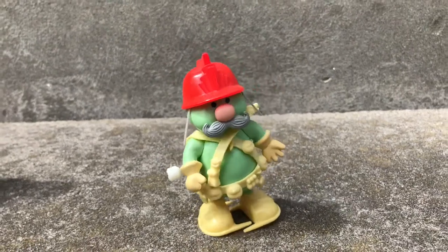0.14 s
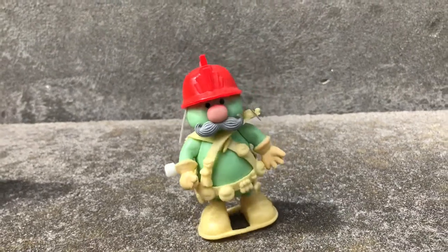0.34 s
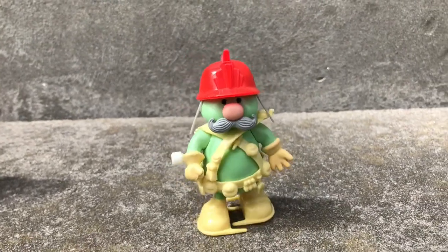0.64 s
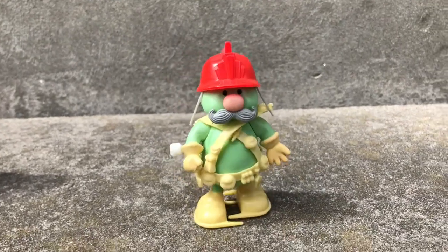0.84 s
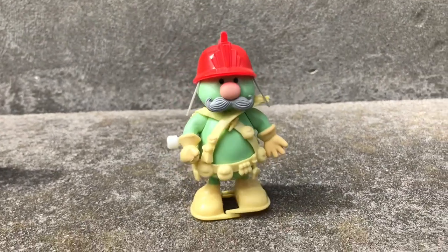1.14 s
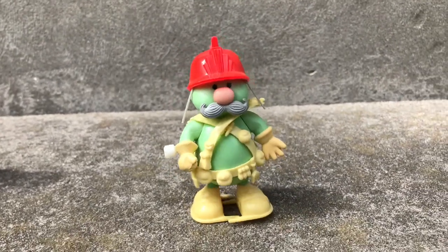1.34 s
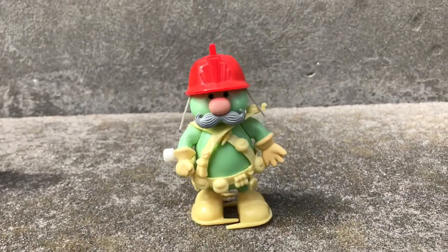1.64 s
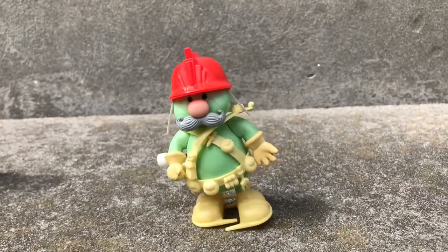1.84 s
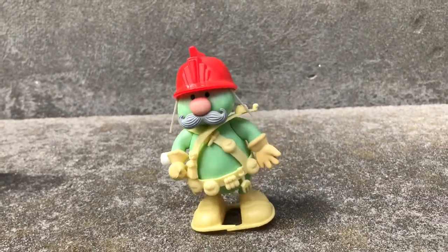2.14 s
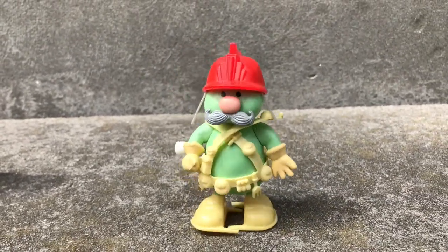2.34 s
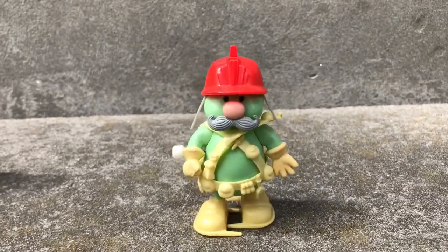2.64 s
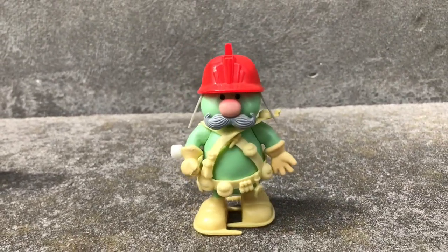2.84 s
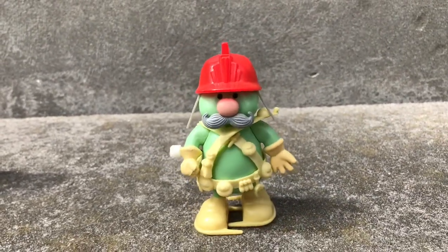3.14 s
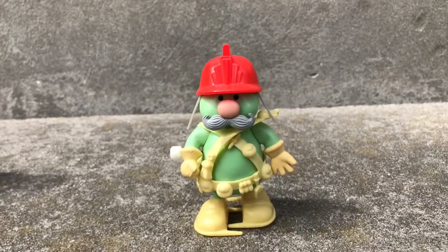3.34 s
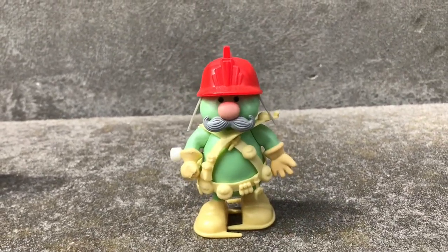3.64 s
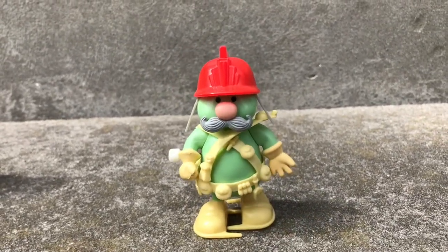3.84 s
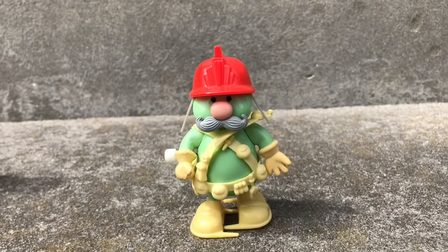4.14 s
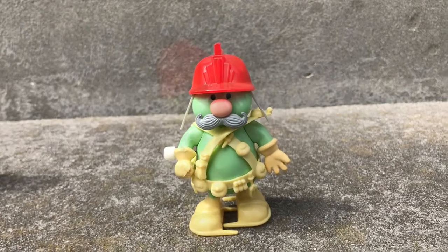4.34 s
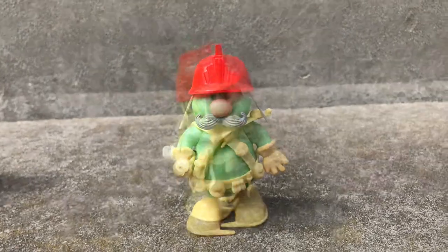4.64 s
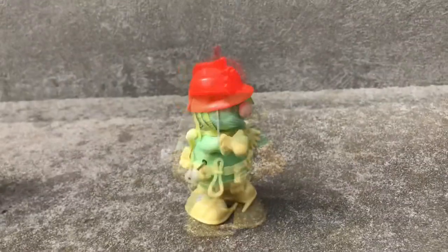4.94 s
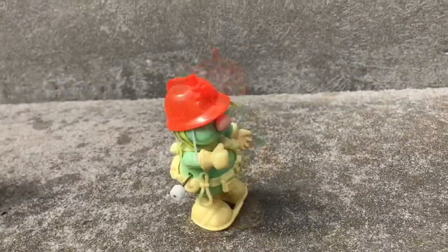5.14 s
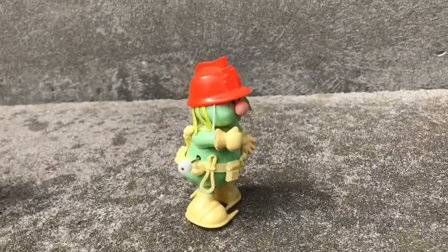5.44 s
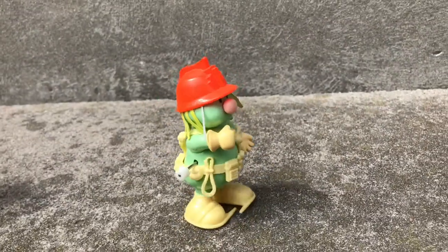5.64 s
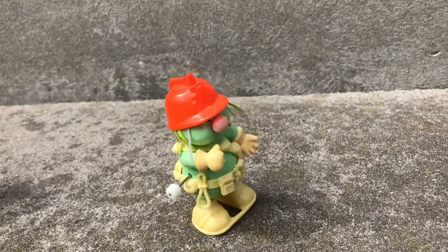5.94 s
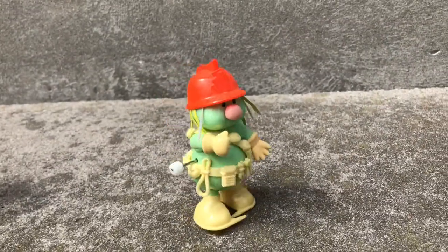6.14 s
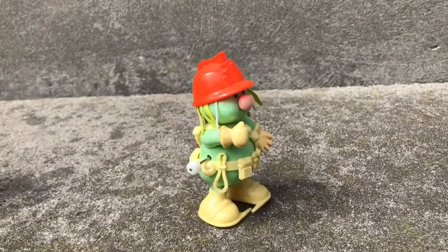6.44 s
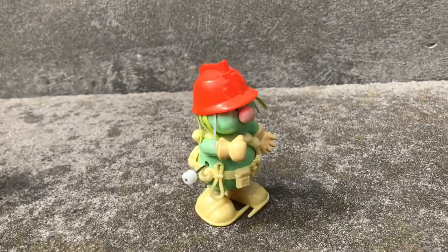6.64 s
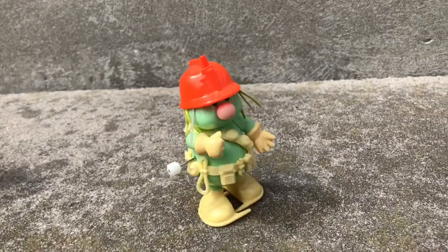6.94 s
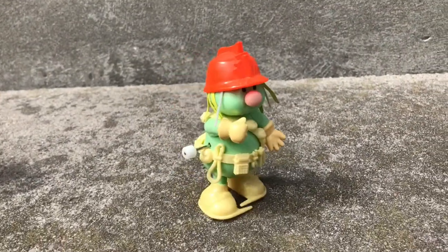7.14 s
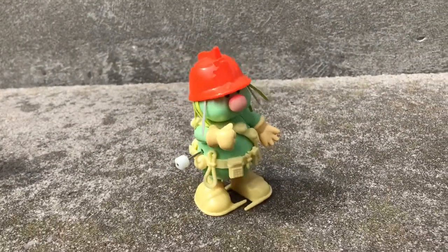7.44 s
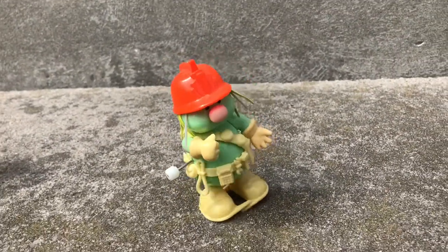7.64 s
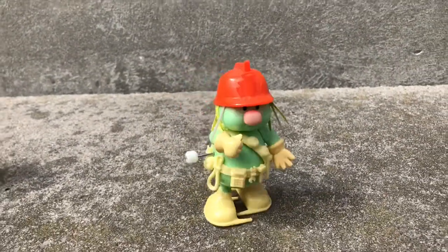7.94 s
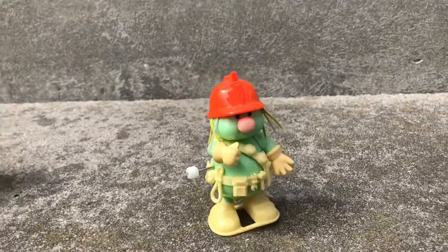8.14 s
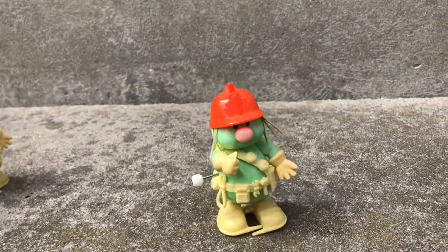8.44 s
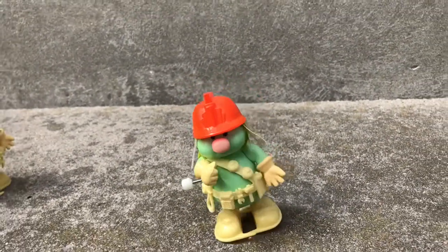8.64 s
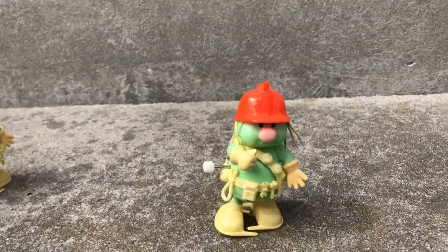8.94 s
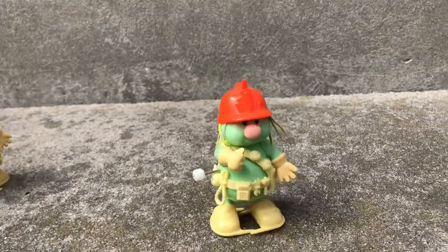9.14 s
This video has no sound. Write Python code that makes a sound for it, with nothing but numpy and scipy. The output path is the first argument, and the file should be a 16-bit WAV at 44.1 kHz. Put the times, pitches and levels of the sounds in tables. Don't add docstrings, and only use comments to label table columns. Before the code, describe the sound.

Close, single-microphone outdoor sound of a wind-up plastic figure: rapid gear teeth buzz inside a hollow case and hard little feet click on concrete. The walk falters, nearly stops, restarts briefly and dies into faint ticks. Quiet distant road rumble, a low engine note and a far gull fill the pause. After a smooth crossfade the toy runs again, rattling continuously and growing somewhat louder and hollower.

```python
import sys
import numpy as np
from scipy import signal
from scipy.fft import rfft, irfft, next_fast_len
from scipy.io import wavfile
from scipy.ndimage import uniform_filter1d, map_coordinates

SR = 44100
rng = np.random.default_rng(int(sys.argv[2]) if len(sys.argv) > 2 else 0)


def bounce(signal):
    frames = np.transpose(np.atleast_2d(signal))
    limited = np.clip(frames, -1, 1)
    pcm = np.round(limited * 32767).astype(np.int16)
    wavfile.write(sys.argv[1], SR, pcm)


def invert_db(x):
    u = np.asarray(x, float) / 20
    return 10 ** u


N = 409248
TIME = np.arange(N) / SR
TURN_S = 3.5


def clockwork():
    # start_s, chatter_db, brightness_db (lean of the gears to the microphone)
    drive_rows = [
        [(0, -35, -1.5), (0.29, -34, 2), (0.68, -34.5, 1.5), (0.7, -44, -4), (0.93, -49.5, -4),
         (1.08, -38, -4.5), (1.35, -28, -3), (1.53, -30.5, -1.5), (1.56, -51, -1.5), (1.7, -52.5, -2),
         (1.77, -38.5, -4), (2.51, -37.5, 3.5), (2.57, -44, -3), (2.68, -48, -4)],
        [(4.3, -32.5, -2.5), (5.7, -29, 0.7), (7.4, -26, 1.2), (9.28, -27, 0.7)],
    ]
    # start_s, foot_mode_hz, foot_db (over the case), case_db, shell_db
    footing = [(0, 3960, -8, 1.5, -1), (.12, 4570, -14, 0, -1.5), (.57, 4100, -4.5, -0.7, 1.5),
               (0.719, 3590, -5.5, 0.5, -2), (1.0, 3600, -6.5, -0.5, 0.5), (1.28, 3700, -3, -2.5, 1),
               (1.4, 4100, -3.5, 2, -1), (1.55, 3600, -14, 5, 6), (1.721, 4450, -5.5, 0.8, -1),
               (2.1, 4600, -26, 1.5, -0.3), (2.42, 4370, -6.5, 0, -2), (2.56, 3600, -13, 2.5, -1),
               (4.3, 5070, -9, 1, 4), (4.539, 4190, 1, -0.5, 2), (4.62, 4790, -1, -1, -2.5),
               (4.691, 3300, -5, 1, 2.5), (4.82, 3536, -9, 0.2, 3), (4.93, 4080, -10, 2.5, 1.5),
               (5.04, 4450, -9, -1.1, -.6), (5.2, 4190, -14, 1, 0.6), (5.43, 4520, -6, -1, 0.5),
               (5.7, 4240, -10, 0.3, -0.2), (6.0, 4100, -15, 0.5, 0.5), (6.18, 4200, -1, 0, 3),
               (6.25, 4320, -8.5, 0, 1.1), (6.53, 4150, -6, -0.5, -1.5), (6.7, 4200, -10, -0.5, 0.5),
               (6.93, 4520, -7, 0.5, -1.5), (7.062, 4234, -1, 0, -3.5), (7.122, 4300, -0.5, -2, 3),
               (7.152, 4554, -7.5, -0.4, -2.5), (7.43, 4080, -10, 0.9, -2.5), (7.8, 4420, -10.5, -0.2, -1),
               (7.9, 4087, -4.5, -1.5, -3.5), (8.079, 4242, -23, 0.6, -4), (8.38, 4420, -8.5, 0.4, -4),
               (8.56, 5920, -6, 0.3, -4), (8.95, 5800, -24, 1, -3.5), (9.052, 2940, -10, 3, -2),
               (9.085, 5800, -6, -1.1, -3)]
    stall_db_per_s, full_speed_db = (584.5, 0), (-34.5, -30.5)
    dull_db_per_brake_db = (0.1042, 0.51)

    level_db, lean_db = np.where(TIME < TURN_S, *map(curves, drive_rows))
    lost_db = braking()
    stall_s = drive_rows[0][-1][0]
    level_db = level_db - lost_db - pose(stall_db_per_s) * (TIME - stall_s).clip(0, .12)
    slower_db = (pose(full_speed_db) - level_db).clip(-9, 45)
    bright_db = lean_db - pose(dull_db_per_brake_db) * lost_db.clip(-9, 15)

    columns = np.transpose(footing)
    stance = np.searchsorted(columns[0], TIME, "right").clip(1) - 1
    _, foot_hz, foot_db, grip_db, hollow_db = columns[:, stance]

    contacts = chatter(slower_db, burst_s=.0008, size_db=.9)
    drive, rocking, hollow = contacts * spiky(rng.standard_normal((3, N)))
    gears = gear_train(drive, bright_db)
    case = case_rattle(drive, rocking, slower_db, foot_hz, foot_db, grip_db)
    small = filtered(gears + case, lambda hz: (hz / 2700) ** 3 / np.sqrt(1 + (hz / 2700) ** 6))
    shell = hollow_shell(hollow, slower_db, hollow_db)

    faded = np.where(TIME < TURN_S, 1, fade_in() ** 1.29)
    unsteady_db = .7 * wobble(16) + .8 * wobble(30)
    return faded * invert_db(level_db - 3 + unsteady_db) * (small + shell)


def chatter(slower_db, burst_s, size_db):
    teeth_hz, slowest_hz, speed_per_db = 440, 135, .5
    coast_db, coast_slide = 17, 3
    speed = invert_db(-speed_per_db * slower_db).clip(slowest_hz / teeth_hz, 1)
    rate = teeth_hz * speed
    scatter = pose((.35, .45))
    slide = pose((.75, 1.9)) * speed ** .5
    coasting = (slower_db > coast_db) & (np.gradient(slower_db) > 0)
    slide = slide + coast_slide * uniform_filter1d(coasting * 1., size=200)

    meshed = np.cumsum(rate * (1 + scatter * wobble(9) / 4)) / SR
    at = np.flatnonzero(np.diff(np.floor(meshed)))
    luck = rng.standard_normal((8000, 2))[:len(at)]
    at = np.clip(at + scatter[at] * luck[:, 0] * SR / rate[at] / 2, 0, N - 1).astype(int)
    teeth = np.bincount(at, invert_db(size_db * luck[:, 1]), N)
    gate = signal.lfilter([1], [1, -np.exp(-1 / (burst_s * SR))], teeth)
    gate = uniform_filter1d(uniform_filter1d(gate, size=36), size=24)

    def loudness(v):
        return np.sqrt(np.abs(uniform_filter1d(v ** 2, size=900)) + 1e-9)

    gate = gate / loudness(gate) + slide
    return gate / loudness(gate)


def braking():
    # slowest_s, brake_db (negative is a surge), braking_s, recovery_s
    loads = [(0.002, -4.5, 0.0023, 0.008), (0.222, 3, 0.012, 0.015), (0.28, -4, 0.019, 0.02),
             (1.347, -1.5, 0.015, 0.017), (0.138, 6.5, 0.039, 0.063), (0.385, -6.5, 0.015, 0.016),
             (0.589, 5.5, 0.047, 0.0142), (0.733, 7, 0.018, 0.01), (0.783, 8, 0.02, 0.0039),
             (0.864, -7.5, 0.013, 0.008), (0.912, 21.5, 0.043, 0.0053), (1.005, 49, 0.077, 0.021),
             (1.178, 6, 0.026, 0.023), (1.417, 13.5, 0.053, 0.13), (1.573, 8, 0.012, 0.014),
             (1.628, 3, 0.032, 0.0035), (1.703, 28, 0.058, 0.053), (1.978, 18, 0.033, 0.013),
             (1.987, -9.5, 0.008, 0.015), (2.11, 14, 0.044, 0.023), (2.4, 8, 0.024, 0.0047),
             (2.514, -5, 0.021, 0.0053), (2.553, 14, 0.035, 0.026), (2.641, 9, 0.011, 0.13)]
    loads_turned = [(4.893, -2.5, 0.054, 0.0095), (5.04, 3, 0.013, 0.013), (5.394, -2.5, 0.022, 0.019),
                    (5.72, -3.5, 0.017, 0.014), (6.345, -3.5, 0.015, 0.0084), (6.584, 2.5, 0.013, 0.02),
                    (7.13, -2.5, 0.014, 0.03), (7.94, 0, 0.021, 0.028), (8.03, -2.5, 0.022, 0.014),
                    (8.595, 1, 0.014, 0.01), (8.631, -1.5, 0.014, 0.0054), (9.075, -2.5, 0.022, 0.01),
                    (9.188, -4, 0.015, 0.0152), (4.922, 6, 0.023, 0.19), (5.21, 6, 0.031, 0.02763),
                    (5.334, 3.5, 0.017, 0.0303), (5.483, 4, 0.034, 0.0857), (5.775, 7, 0.034, 0.0198),
                    (5.885, 2.5, 0.035, 0.0977), (6.045, 5, 0.017, 0.14), (6.235, 4.5, 0.027, 0.0512),
                    (6.36, 3.5, 0.033, 0.1305), (6.613, 5, 0.047, 0.053), (6.717, 6, 0.026, 0.0765),
                    (6.809, 2.5, 0.049, 0.1), (6.906, 7, 0.036, 0.0814), (7.091, 8.4, 0.084, 0.0497),
                    (7.197, 8, 0.045, 0.0776), (7.464, 10, 0.031, 0.078), (7.574, 6, 0.019, 0.14),
                    (7.683, 3.5, 0.024, 0.0517), (7.761, 7.5, 0.036, 0.097), (7.877, 7, 0.021, 0.0697),
                    (8.064, 8, 0.076, 0.0952), (8.17, 2.6, 0.024, 0.028), (8.341, 12, 0.028, 0.061),
                    (8.454, 8.4, 0.025, 0.17), (8.65, 6, 0.027, 0.091), (8.723, 1.5, 0.045, 0.119),
                    (8.862, 3, 0.028, 0.091), (8.994, 9.5, 0.079, 0.046), (9.114, 4.5, 0.038, 0.078),
                    (9.273, 8.5, 0.07, 0.05)]
    lost_db = np.zeros(N)
    for s, db, fall_s, recover_s in [*loads, *loads_turned]:
        span = slice(max(round((s - fall_s) * SR), 0), round((s + 8 * recover_s) * SR))
        t = TIME[span] - s
        back = 1 - (1 - invert_db(-db)) * np.exp(-t.clip(0) / recover_s)
        lost_db[span] += np.where(t < 0, db * (1 + t / fall_s), -20 * np.log10(back))
    return lost_db


def gear_train(drive, bright_db):
    # centre_hz, width_hz, level_db
    gear_modes = [
        [(8740, 780, 2), (11130, 320, 1.5), (12120, 1500, 1), (16300, 2100, -4)],
        [(8890, 750, -3.5), (9840, 116, 1.5), (12000, 2300, -4.5), (13100, 810, -1), (14600, 1400, -2),
         (15300, 470, -9)],
    ]
    gears = patchy(posed(drive, gear_modes), patchy_db=1.2, streak_db=2.4)
    top = filtered(gears, lambda hz: hz > 10800)
    return (gears - top) * invert_db(-bright_db / 2) + top * invert_db(bright_db / 2)


def case_rattle(drive, rocking, slower_db, foot_hz, foot_db, grip_db):
    # centre_hz, width_hz, level_db
    case_modes = [
        [(4100, 950, -8.5), (4650, 550, -4.5), (5610, 400, -3), (6120, 236, 0.5), (6910, 800, -9)],
        [(3300, 2570, -7.5), (4200, 770, -1), (5050, 1420, -1.5), (5620, 690, 3), (7100, 250, 1),
         (7190, 200, 1.5)],
    ]
    case_db = pose((-3, -5)) + pose((0.14, 0.24)) * slower_db + 0.32 * slower_db.clip(max=0)
    case = patchy(posed(drive, case_modes), patchy_db=1.2, streak_db=2.4)
    foot_gain = invert_db(uniform_filter1d(foot_db, size=900) + 2.6 * wobble(25))
    case += foot_gain * moving_mode(rocking, foot_hz * (1 + .02 * wobble(12)), width_hz=330)
    return invert_db(case_db - 2.5 + uniform_filter1d(grip_db, size=2000)) * case


def hollow_shell(hollow, slower_db, hollow_db):
    # centre_hz, width_hz, level_db
    shell_modes = [
        [(874, 99, 3), (1690, 680, 1.5), (1940, 72, 8.5), (2370, 270, 5)],
        [(932, 113, 3), (1433, 397, -6.5), (2370, 140, 5)],
    ]
    shell_db = pose((-19.5, -20.5)) + pose((0.29, 0.53)) * slower_db
    shell_db = shell_db + 0.47 * (TIME - 7).clip(-3) * (TIME > TURN_S)
    shell_db = shell_db + uniform_filter1d(hollow_db, size=2000)
    return invert_db(shell_db + 3.0 + 2.76 * wobble(11)) * posed(hollow, shell_modes)


def feet_and_loose_parts():
    # start_s, peak_db, pitch_hz, upper_mode_db
    steps = [(0.0974, -26.5, 4570, -10), (0.182, -27, 4460, 0), (0.2428, -25.5, 3880, -6),
             (0.2614, -47, 4650, -2), (0.2773, -26, 4730, 8), (0.3774, -43, 4590, -4),
             (0.7674, -42, 3280, -15), (0.787, -30, 3695, -17), (0.9233, -53, 3490, 6),
             (1.0086, -61, 3580, 1), (1.3379, -39.5, 3800, -9.5), (1.3622, -22.5, 3970, -19),
             (1.5254, -25, 3650, -1), (1.5754, -42, 4020, 6), (1.592, -28.5, 3820, -15),
             (1.598, -30.5, 4990, 8), (1.6054, -31, 3470, -17), (1.619, -35, 3960, 9),
             (1.6395, -30.5, 4100, 8), (1.6606, -39.5, 3930, 0), (1.6821, -47.5, 3006, -15),
             (1.7122, -37, 4150, 14), (1.7407, -42.5, 4100, -4), (1.987, -32, 4650, 6),
             (2.572, -34, 3487, -14), (2.587, -40, 3260, 0), (2.6244, -37, 4580, -12)]
    # start_s, peak_db, pitch_hz, upper_mode_db
    clacks_turned = [(4.5463, -39, 4200, -18), (4.7773, -37, 3300, -7), (4.903, -32, 4500, -22),
                     (5.023, -31, 3884, -20), (5.1647, -20, 4070, -6), (5.3926, -25, 4220, -16),
                     (5.496, -25, 4650, -22), (5.6608, -30, 4650, -13), (5.81, -34, 4100, -8),
                     (5.9526, -25.5, 4170, -10), (6.024, -25, 4440, 3), (6.0305, -28, 3300, -4),
                     (6.198, -34, 4300, -15), (6.2088, -25.5, 4350, -15), (6.342, -26, 4400, -11),
                     (6.557, -24, 4120, -15), (6.662, -28, 4200, -10), (6.65, -31, 3800, -15),
                     (6.6947, -33, 4397, 1), (6.8425, -16.5, 4020, -27), (6.846, -26, 3900, -27),
                     (6.9745, -42, 4392, -8), (7.0833, -21.5, 4460, -20), (7.102, -31, 3850, -21),
                     (7.1295, -27, 4090, -17), (7.6972, -24, 4200, 5), (7.7243, -25, 4600, -17),
                     (6.854, -25, 4300, -12), (8.0267, -25, 4240, 2), (8.626, -29, 3820, -12),
                     (8.6316, -20.5, 4390, -7), (8.8603, -26.5, 4320, -18), (8.884, -26, 4000, -5),
                     (9.0803, -24, 4250, 1), (9.213, -23, 3920, -23),
                     (4.6014, -36, 4343, -13), (5.1594, -26, 4070, -1), (5.7514, -27, 4414, -7),
               (6.0531, -26, 4100, -1), (6.421, -27.5, 4600, -6), (6.605, -35, 3350, -11),
               (6.8764, -27.5, 4530, 3), (7.1677, -24.5, 4530, -12), (7.441, -27.5, 4560, -6),
               (7.9875, -37, 4193, -8), (8.1463, -33.5, 3490, -11), (8.2275, -28, 4490, -11),
               (8.305, -26, 3970, -6), (8.923, -34.5, 3950, -8), (9.0358, -27, 4140, 0),
               (4.968, -33, 4050, -10), (5.353, -25, 4090, -11), (5.474, -35, 4490, -8),
               (5.529, -28, 4800, -8), (5.574, -35, 4760, -6), (5.92, -32, 4603, 3), (6.002, -27, 5310, -1),
               (6.067, -25.5, 4880, -7), (6.223, -30, 4100, -12), (7.9043, -31, 4390, -13),
               (7.9236, -32, 3704, -8), (8.571, -31, 6750, -1.5), (8.595, -26, 6800, -1.5),
               (8.68, -26.5, 7100, -1), (9.061, -28.5, 2856, 5), (9.1007, -31, 4330, -3),
               (9.189, -30, 3750, -4)]
    settling = [
        (2.7626, -58, 4130, -5),
        (2.8335, -66, 3300, -9),
        (2.8574, -58, 3640, -13),
        (2.8659, -55, 3910, -16),
        (2.8785, -53.5, 5980, -7),
        (3.1944, -67, 4180, 0),
        (3.5633, -62, 5900, -1),
    ]
    facing = clacks(steps, t60=.014, gain_db=-1.2, scuff_s=.0013, knock_db=-26)
    turned = clacks(clacks_turned, t60=.017, gain_db=-1.6, scuff_s=.002, knock_db=-20)
    ticks = clacks(settling, t60=0.018, gain_db=2.0, scuff_s=0.0016, knock_db=-38)
    return facing + turned + ticks


def clacks(events, t60, gain_db, scuff_s, knock_db):
    out = np.zeros(N + SR)
    t = np.arange(SR // 10) / SR
    for s, db, hz, upper_db in events:
        luck = rng.standard_normal((2, len(t)))
        modes = [(hz, 0), (0.79 * hz, -9), (0.85 * hz, -5), (1.2 * hz, -5), (1.8 * hz, -8),
                 (5900, upper_db), (6750, upper_db + 2.5)]
        ring = sum(invert_db(g - 60 * t / t60) * np.sin(2 * np.pi * f * t) for f, g in modes)
        swell = (t / scuff_s) ** 2 * np.exp(-2 * t / scuff_s)
        scuff = np.diff(swell * luck[0] * luck[1], prepend=0)
        ragged = signal.fftconvolve(scuff, ring)[:len(t)]
        blow = invert_db(-60 * t / (t60 * 1.6)) * (1 - np.exp(-t / scuff_s)) ** 2 * np.sin(2 * np.pi * hz * t)
        hit = ragged / np.abs(ragged).max() + .7 * blow / np.abs(blow).max()
        knock = invert_db(knock_db - 60 * t / 0.089) * (1 - np.exp(-t / 0.0036)) * np.sin(2 * np.pi * 950 * t)
        clack = hit / np.abs(hit).max() + 0.32 * scuff + knock
        out[round((s - .002) * SR):][:len(t)] += invert_db(db + gain_db) * clack
    return out[:N]


def gull():
    # time_s, second_partial_hz, level_db
    call = [
        [(2.875, 2000, -72), (2.9, 2110, -73), (2.935, 2220, -72), (2.96, 2380, -61)],
        [(2.94, 1960, -66), (2.958, 1860, -70), (2.995, 1850, -66)],
        [(2.968, 2360, -67), (2.992, 2232, -61), (3.07, 2208, -62), (3.1, 2190, -70), (3.14, 2190, -69),
         (3.2, 2070, -71), (3.22, 2030, -76)],
        [(3.085, 3310, -82), (3.165, 3270, -82)],
    ]
    # frequency_ratio, level_db
    call_partials = [
        [(1, 0), (4 / 3, -12)],
        [(1, 1), (3 / 2, -5), (5 / 4, -14)],
        [(1, 0), (2, -15)],
        [(1, -2)],
    ]
    out = np.zeros(N)
    for rows, partials in zip(call, call_partials):
        hz, db = curves(rows)
        edge = np.clip(np.minimum(TIME - rows[0][0], rows[-1][0] - TIME) / .016, 0, 1)
        phase = 2 * np.pi * np.cumsum(hz) / SR
        gain = edge * invert_db(db + 8 + 2.0 * wobble(55))
        out += gain * sum(invert_db(g) * edge ** k * np.sin(k * phase) for k, g in partials)
    return out


def traffic():
    # frequency_hz, density_db (per Hz)
    road_spectrum = [(13, -52), (22, -42), (43, -1), (76, -1), (178, -14), (222, -11), (255, -16.5),
                     (284, -18.5), (566, -27.5), (1100, -20.5), (2640, -39), (4970, -48), (6030, -46.5),
                     (7520, -51), (15800, -49.5)]
    hz, db = np.transpose(road_spectrum)

    def road_response(f):
        port_dip_db = 6 * np.exp(-((f - 10400) / 380) ** 2)
        return invert_db(np.interp(np.log(f + 1), np.log(hz), db) - port_dip_db)

    road = filtered(rng.standard_normal(N), road_response)
    engine_hz = 233 - 2.5 * TIME + .5 * wobble(3)
    engine = invert_db(-13.5 + 1.5 * wobble(4)) * np.sin(2 * np.pi * np.cumsum(engine_hz) / SR)
    thud = invert_db(-43.5) * np.exp(-((TIME - 2.633) / .014) ** 2) * np.sin(2 * np.pi * 197 * TIME)
    going = invert_db(-51.5) * (1 - fade_in())
    coming = invert_db(-51) * fade_in() ** 1.3
    return np.hypot(going, coming) * unit(road) + going * engine + thud


def pose(pair):
    return np.where(TIME < TURN_S, *pair)


def posed(x, modes):
    early = TIME < TURN_S
    facing = resonant(x * early, modes[0]) * np.sqrt(early.mean())
    turned = resonant(x * ~early, modes[1]) * np.sqrt(1 - early.mean())
    return facing + turned


def fade_in():
    start_s, length_s = 4.282, 0.83
    return np.clip((TIME - start_s) / length_s, 1e-3, 1)


def resonant(x, modes):
    def body(f):
        total = 0
        for k, (centre, width, db) in enumerate(modes):
            damped = 1j * f * width
            total = total + (-1) ** k * invert_db(db) * damped / (centre * centre - f * f + damped)
        return total

    return unit(filtered(x, body))


def moving_mode(x, hz, width_hz):
    turn = np.exp(2j * np.pi * np.cumsum(hz) / SR)
    slow = signal.sosfilt(signal.butter(2, width_hz / SR, output="sos"), x / turn)
    return unit((slow * turn).real)


def patchy(x, patchy_db, streak_db):
    z = signal.stft(x, nperseg=512)[2]
    broad, narrow = rng.standard_normal((2, *z.shape))
    broad = uniform_filter1d(uniform_filter1d(broad, size=9, axis=0), size=10, axis=1)
    narrow = uniform_filter1d(uniform_filter1d(narrow, size=2, axis=0), size=28, axis=1)
    gain = invert_db(patchy_db * unit(broad) + streak_db * unit(narrow))
    gain /= np.sqrt(np.average(gain ** 2, axis=0, weights=np.mean(np.abs(z) ** 2, axis=1)))
    return unit(signal.istft(z * gain, nperseg=512)[1][:N])


def spiky(x):
    return x * np.abs(x) ** .4


def filtered(x, response):
    m = next_fast_len(N + 8192)
    return irfft(rfft(x, m) * response(np.fft.rfftfreq(m, 1 / SR)), m)[:N]


def curves(rows, t=TIME):
    s, *cols = np.transpose(rows)
    return [np.interp(t, s, c) for c in cols]


def wobble(rate):
    return map_coordinates(rng.standard_normal(int(N * 60 / SR) + 4), [TIME * min(rate, 60)])


def unit(x):
    return x / np.sqrt(np.mean(x ** 2) + 1e-20)


def scene():
    mono = clockwork() + feet_and_loose_parts() + gull() + traffic()
    return np.tile(mono, (2, 1))


def roll_off(x):
    return signal.sosfilt(signal.butter(12, 17060, fs=SR, output="sos"), x)


def record(dry):
    limited = filtered(dry[0], lambda hz: hz < 15830)
    return roll_off(np.tile(limited, (2, 1)))


dry = scene()
out = record(dry)
bounce(out)
```